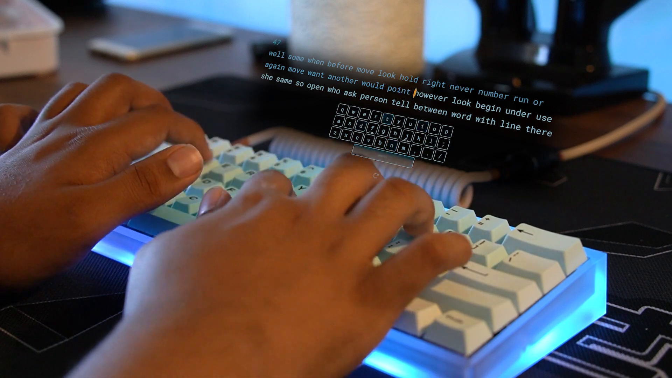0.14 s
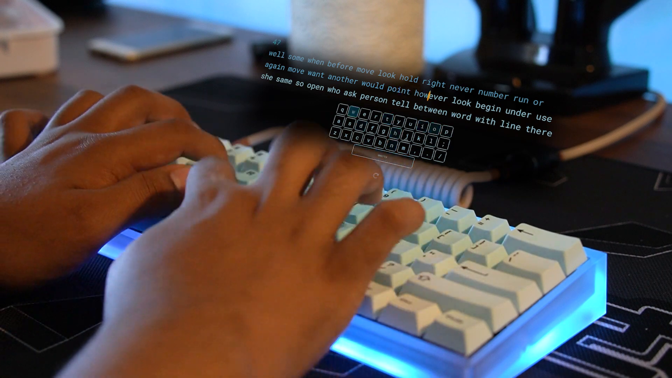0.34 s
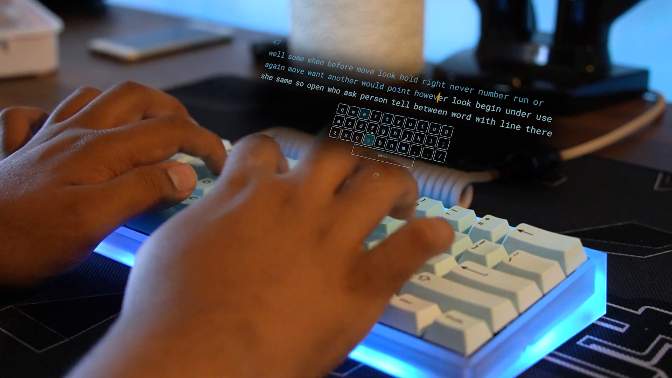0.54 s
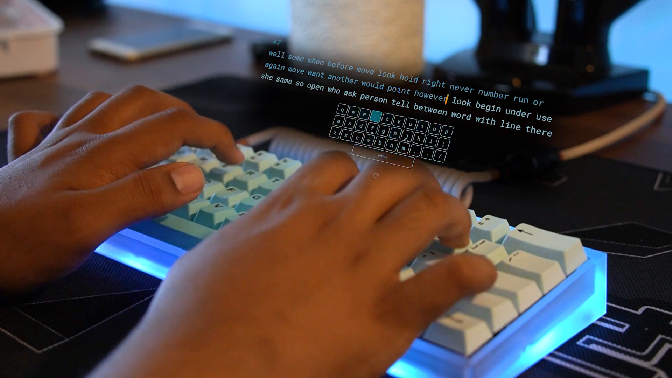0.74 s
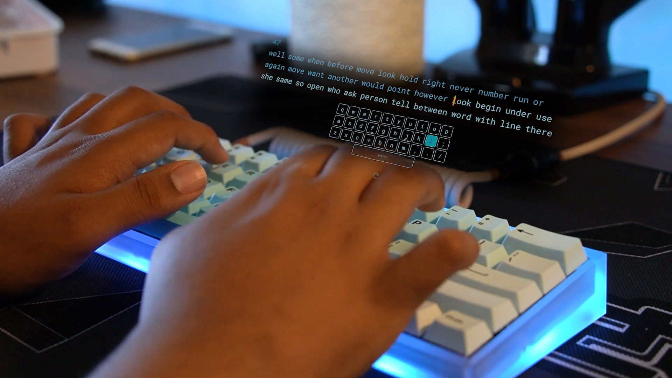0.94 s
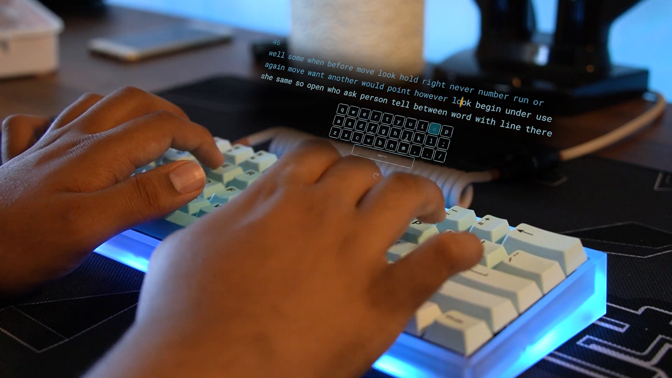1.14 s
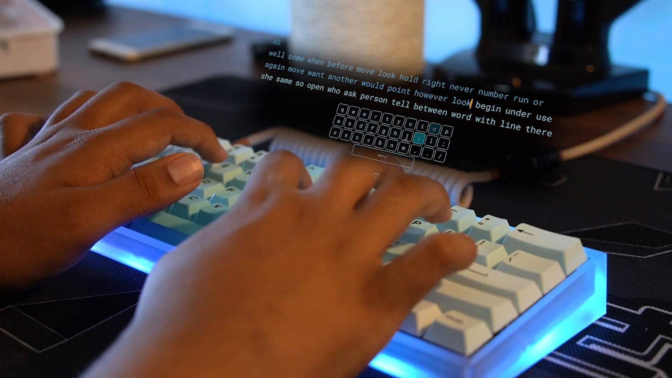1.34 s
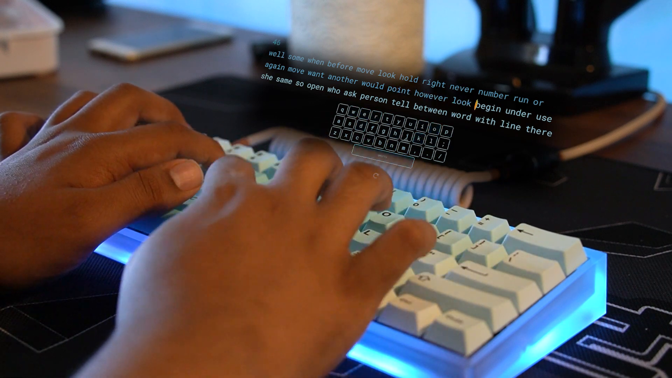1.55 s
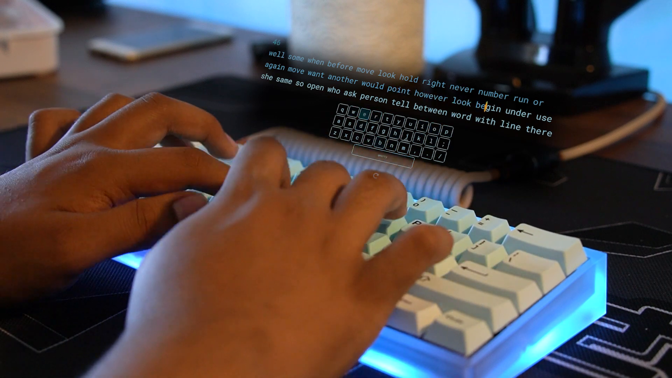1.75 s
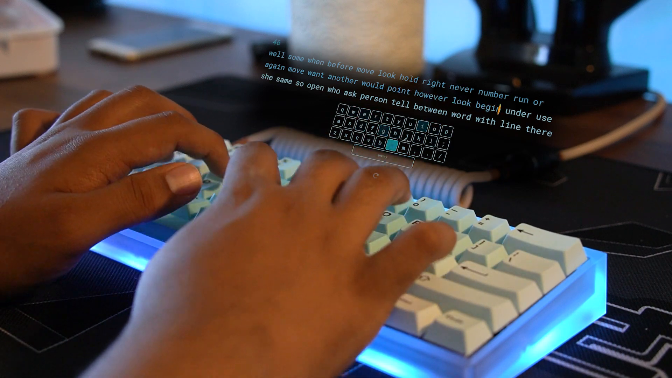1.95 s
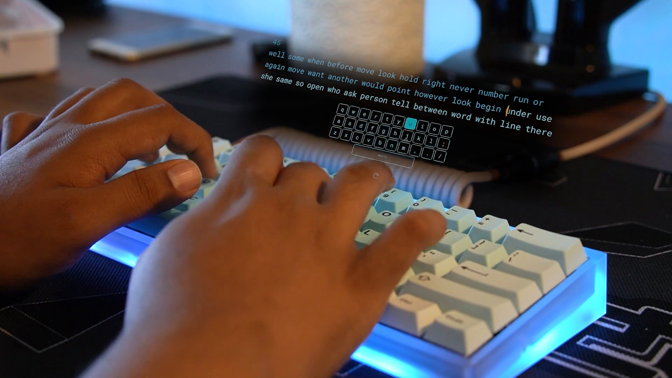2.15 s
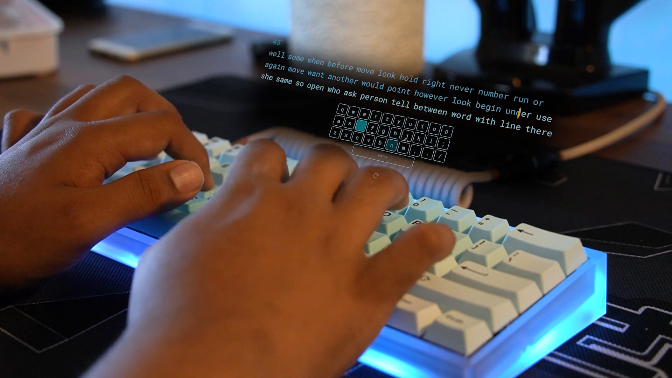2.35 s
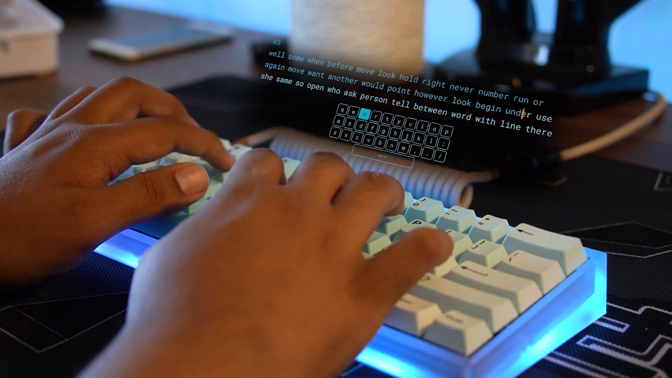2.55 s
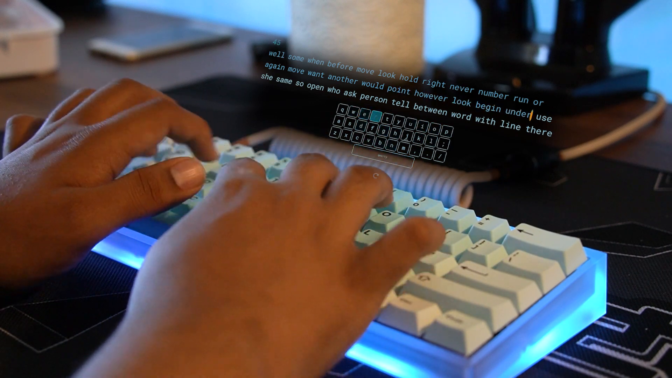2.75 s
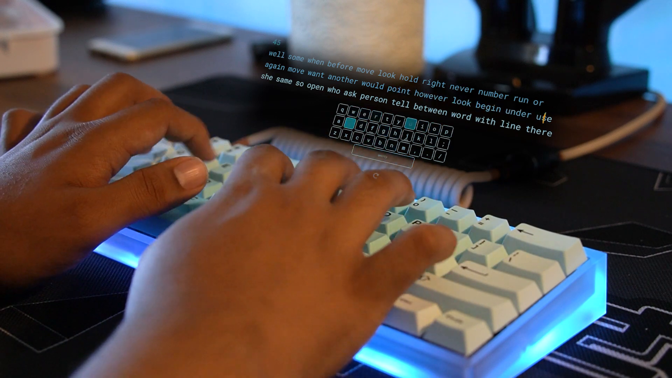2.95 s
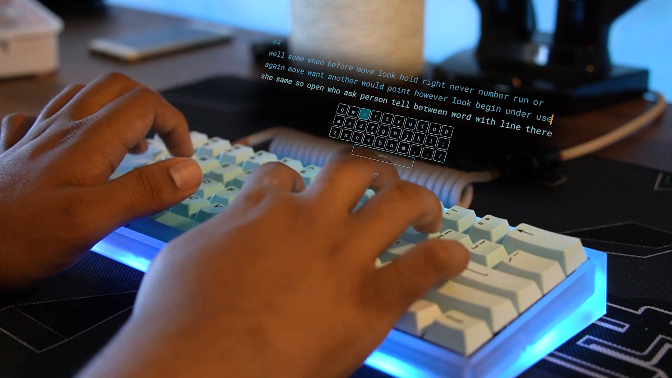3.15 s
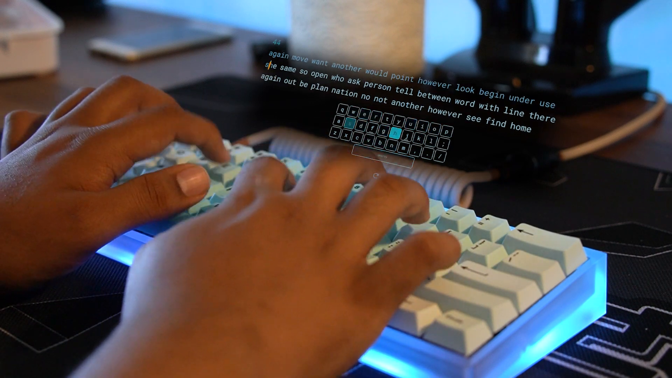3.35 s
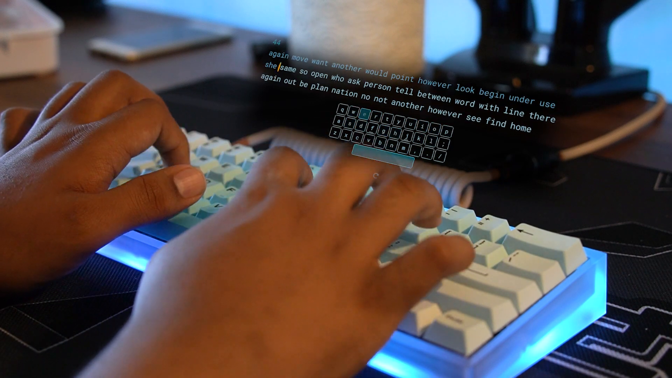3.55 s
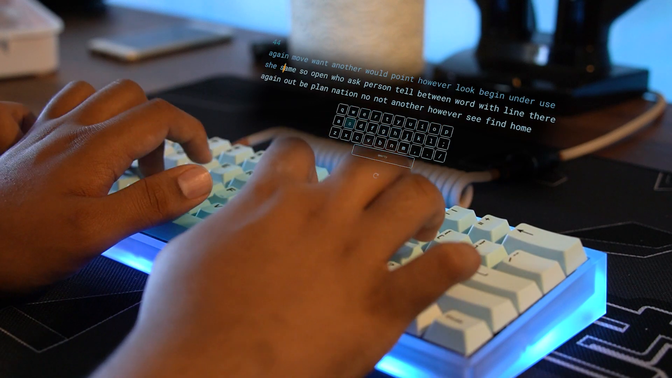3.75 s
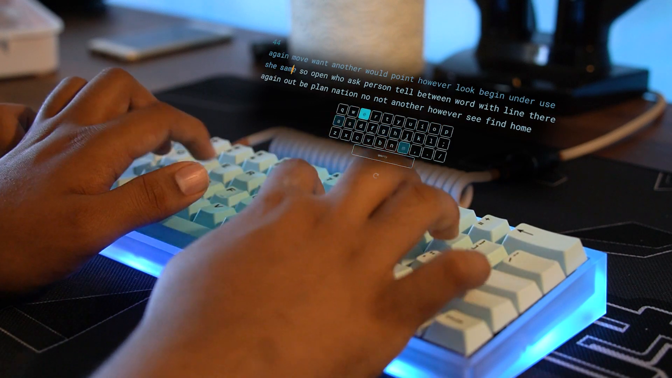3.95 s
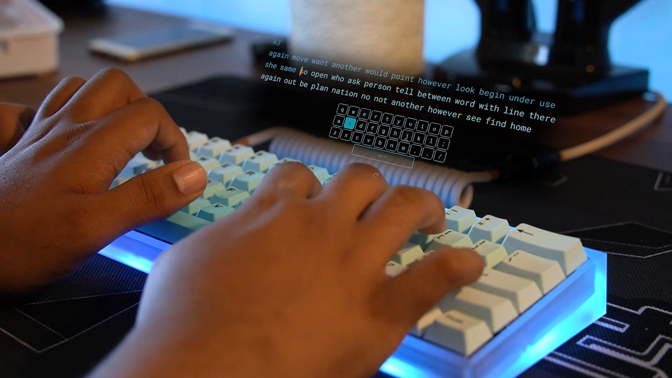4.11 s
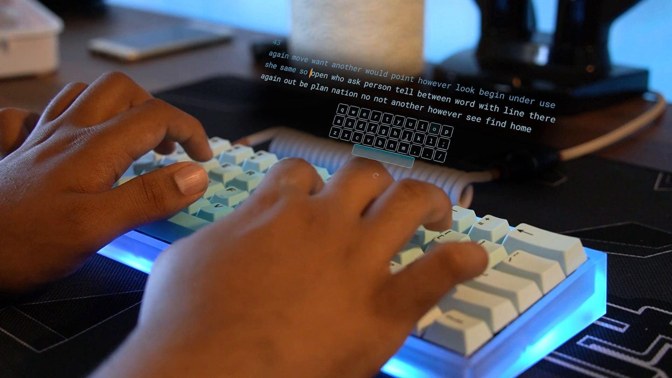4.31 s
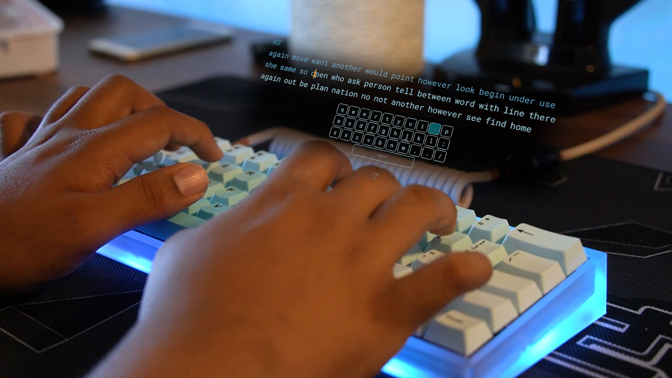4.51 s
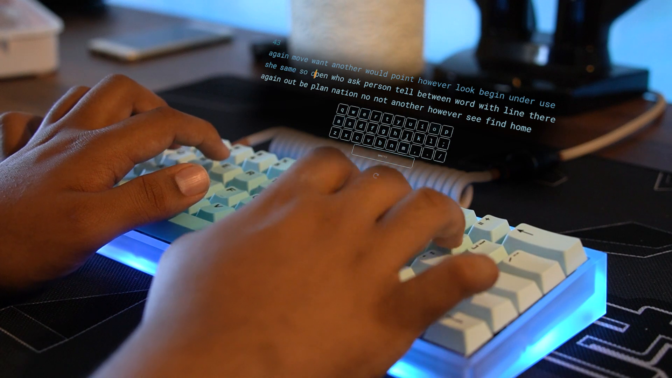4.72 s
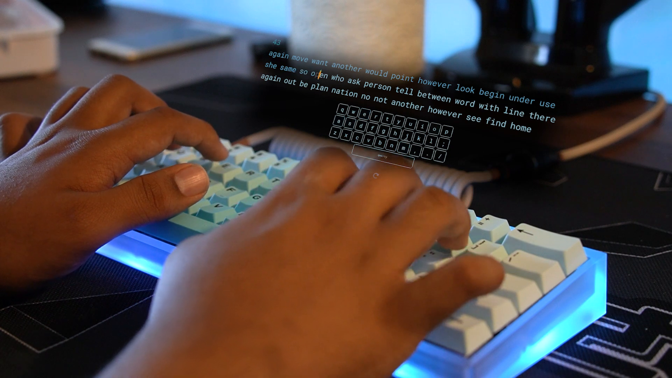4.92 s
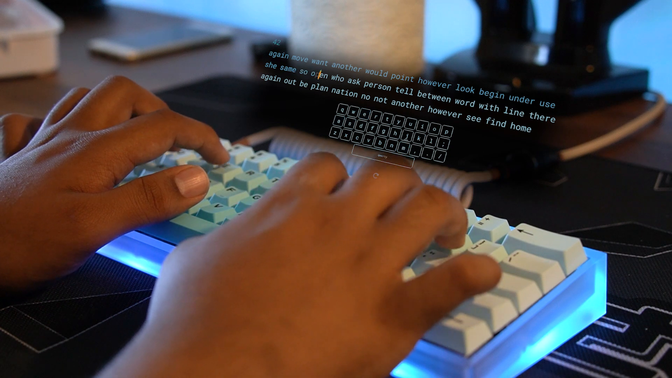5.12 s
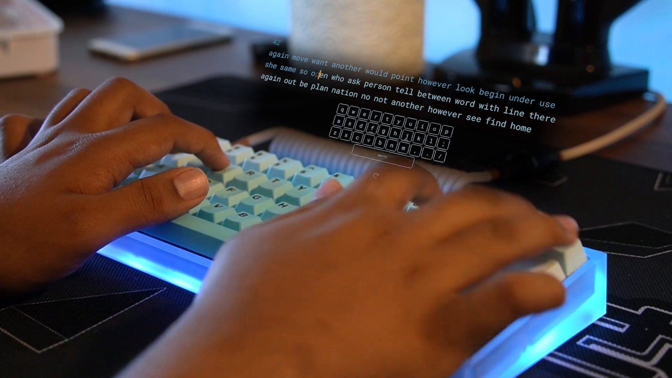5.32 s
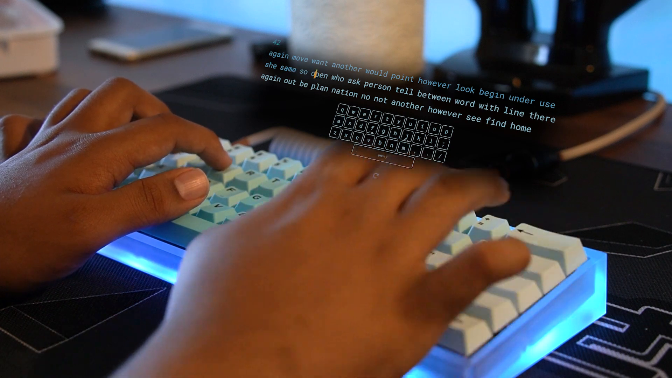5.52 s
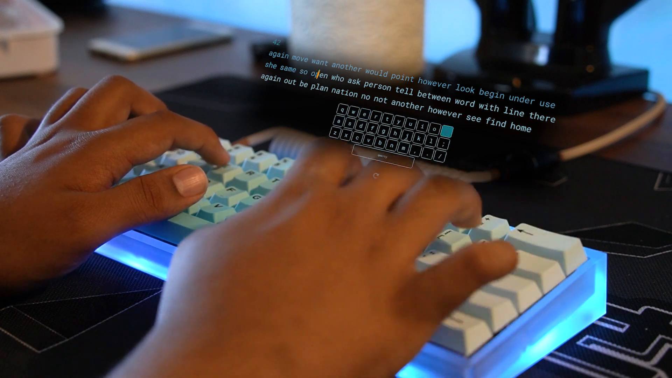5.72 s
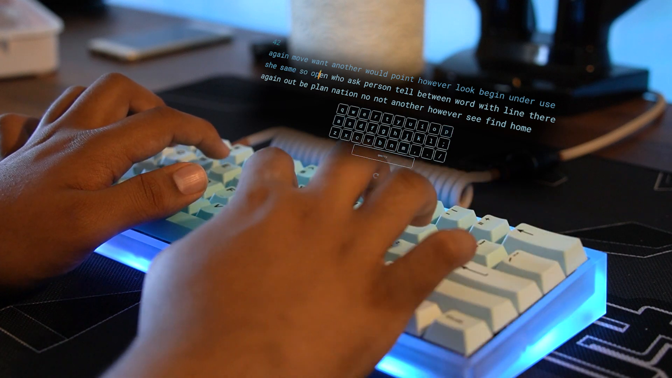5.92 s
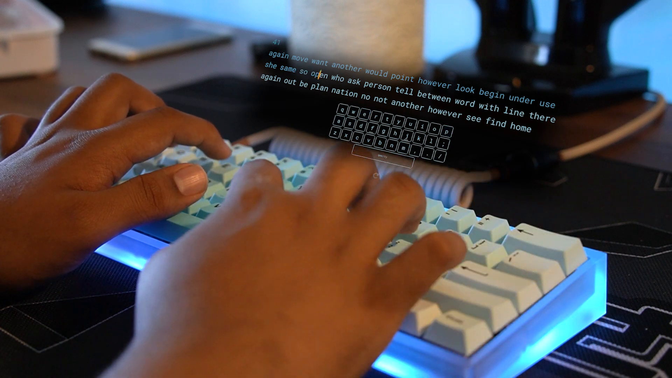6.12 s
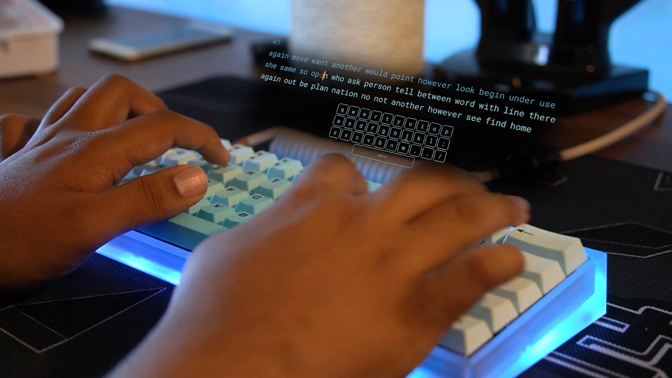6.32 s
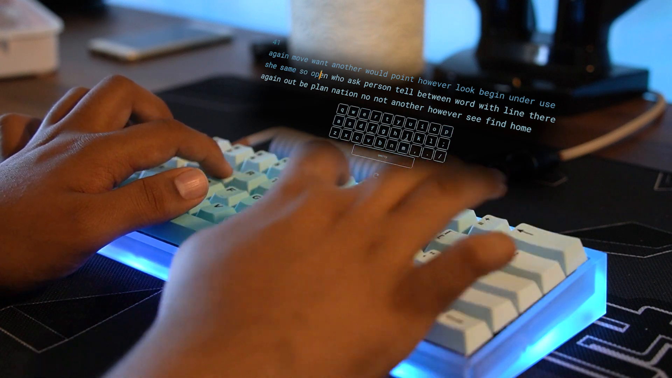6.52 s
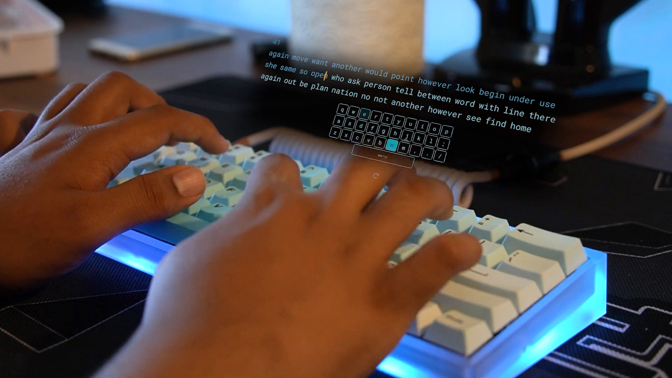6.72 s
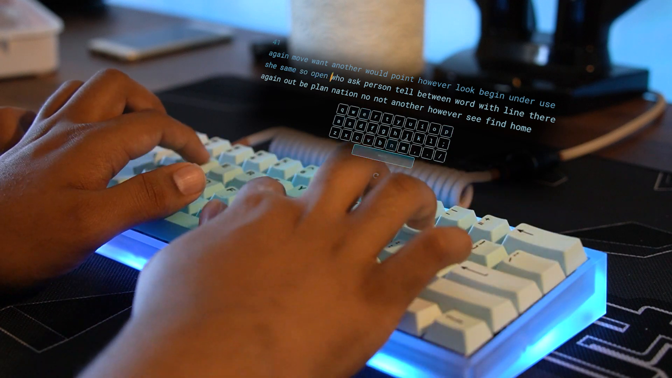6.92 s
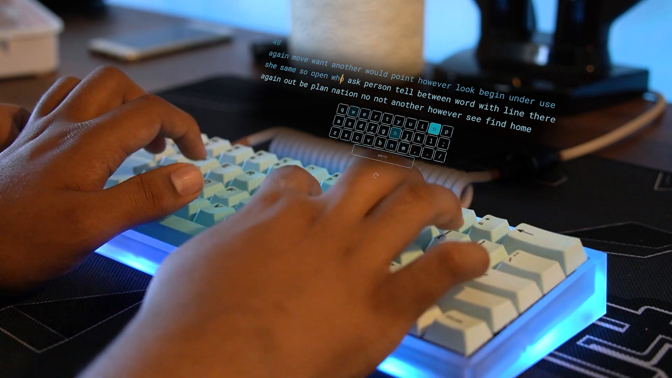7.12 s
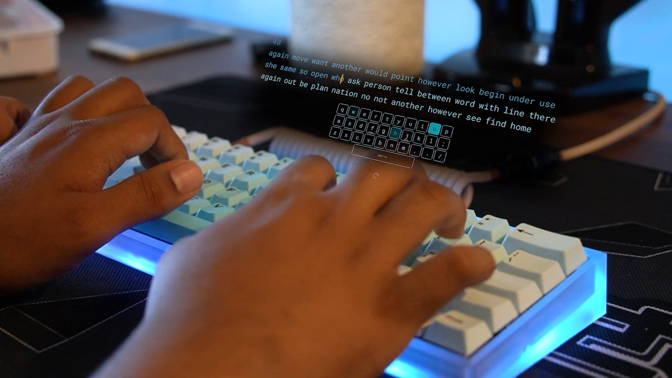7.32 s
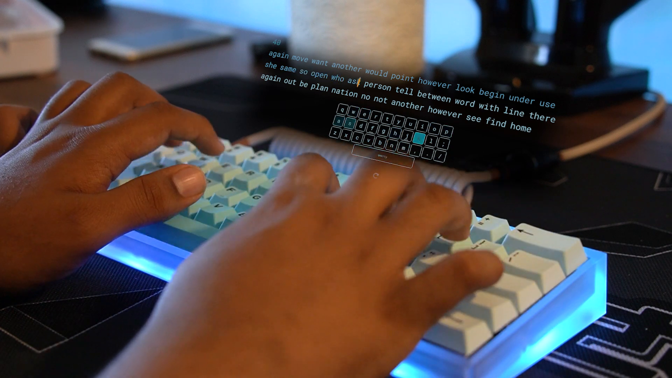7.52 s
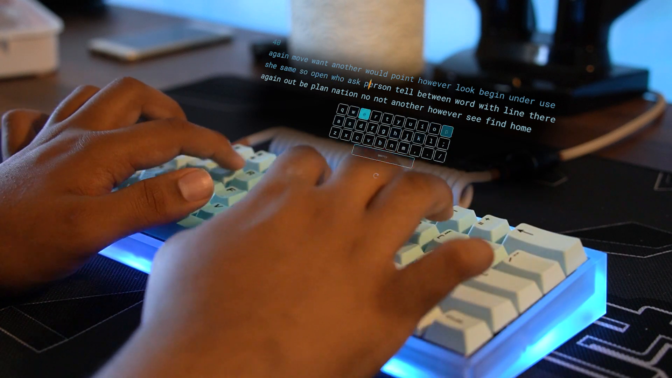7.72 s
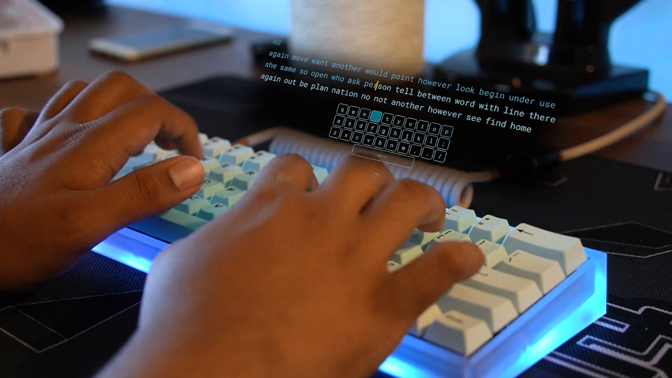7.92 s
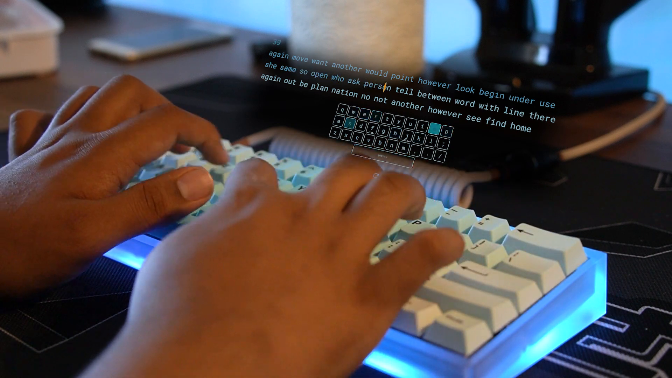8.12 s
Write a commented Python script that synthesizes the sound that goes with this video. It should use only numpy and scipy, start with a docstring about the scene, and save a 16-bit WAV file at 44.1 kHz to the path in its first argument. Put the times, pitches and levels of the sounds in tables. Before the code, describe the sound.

Fast typing on a mechanical keyboard in a thick plastic case starts right away, heard from a close microphone on the same desk. Crisp, bright clacks come in dense, uneven runs, some sharp and some light, with one of the hardest near 0.4 seconds. Wide keys add occasional hollower knocks. The typing stays busy until about 4.3 seconds, then thins to a few isolated, mostly softer taps, including a small cluster around 5.5 seconds and two clicks just after 6. From about 6.5 seconds the quick typing resumes and continues to the end, a little past 8 seconds. The strokes send soft thuds and a faint low rumble through the desk, with very faint fingertip ticks on the keycaps. The small room gives only a trace of echo, and a quiet fan hum and hiss run throughout.

```python
"""Fast typing on a mechanical keyboard in a thick plastic case, close to a microphone on the same desk.
Each key's stem (the post under the cap) hits its stop in a few quick contacts, making the cap, stem,
switch housing, plate and case ring for a moment. Fingertips rustle and the desk sways under the hands.
A small room echoes faintly, and fans hum over the microphone hiss."""
import sys
import numpy as np
from scipy import signal
from scipy.fft import rfft, irfft, next_fast_len
from scipy.io import wavfile

SR = 44100
rng = np.random.default_rng(int(sys.argv[2]) if len(sys.argv) > 2 else 0)


def wrap_up_sound(samples):
    """Save the sound to the file named by the first command line argument, as 16-bit audio."""
    columns = np.atleast_2d(samples).T
    # keep every value between -1 and 1, then stretch to whole-number steps
    tamed = np.clip(columns, -1, 1)
    steps = np.round(tamed * 32767).astype(np.int16)
    wavfile.write(sys.argv[1], SR, steps)


N = 364266


def undb(db):
    """Turn decibels into a number to multiply a sound by."""
    return 10 ** (np.asarray(db) / 20)


def shaped_noise(gain):
    """Noise with an average level (rms) of 1; gain(hz) says how strong each pitch is."""
    size = next_fast_len(N)
    hz = np.maximum(np.arange(size // 2 + 1) * SR / size, 1)
    noise = irfft(rfft(rng.standard_normal(size)) * gain(hz), size)[:N]
    return noise / np.sqrt(np.mean(noise ** 2))


def ring(tones, level_span_s, hits=(1.0,), pitch_scale=1, detune=0, luck=((0, 0),) * 6):
    """A struck part rings with tones that fade 60 dB in ring_s. Its rms is 1 over level_span_s."""
    t = np.arange(int(SR * max(ring_s for _, _, ring_s in tones))) / SR
    body = np.zeros(len(t))
    for (hz, db, ring_s), (level_luck, pitch_luck) in zip(tones, luck):
        pitch_hz = hz * pitch_scale * (1 + detune * pitch_luck)
        body += undb(db + 5 * level_luck - 60 * t / ring_s) * np.sin(2 * np.pi * pitch_hz * t)
    lowest_hz, highest_hz = pitch_scale * min(tones)[0], pitch_scale * max(tones)[0]
    if lowest_hz > 1500:  # the finger chokes the small parts after about 3 ms
        body *= np.exp(-(t / .003) ** 2)
    # a part gives off little below its lowest tone, and a soft hit stirs little above its highest
    edges_hz = [0.79 * lowest_hz, min(1.57 * highest_hz, .45 * SR)]
    band = signal.butter(3, edges_hz, "band", fs=SR, output="sos")
    sound = signal.sosfilt(band, signal.fftconvolve(body, hits))
    return sound / np.sqrt(np.sum(sound[:int(level_span_s * SR)] ** 2) / (level_span_s * SR))


# The shape of the room noise and microphone hiss: pitch_hz, relative_db
HISS_SHAPE = [(40, -52), (60, 0.5), (85, -9), (180, -7), (260, -14), (470, -15.5), (800, -18),
              (1300, -20.5), (2500, -23.5), (6000, -26.5), (16000, -31)]
# The hum of fans and mains power: pitch_hz, width_hz, level_db
HUM_TONES = [(115.85, 4.7, -68.5), (131, 11, -81.5), (179.5, 6.1, -71.5), (216.3, 3.7, -78), (473, 10, -84),
             (496, 8, -82), (768, 2.5, -83)]


def hiss_and_hum():
    """Steady room noise and hiss, with a wavering hum and a thin whine."""
    pitches_hz, shape_db = np.transpose(HISS_SHAPE)
    hiss = shaped_noise(lambda hz: undb(np.interp(np.log(hz), np.log(pitches_hz), shape_db, left=-60)))
    hum = sum(undb(level_db) * shaped_noise(lambda hz: 1 / (1 + (2 * (hz - pitch_hz) / width_hz) ** 2))
              for pitch_hz, width_hz, level_db in HUM_TONES)
    whine = np.sqrt(2) * np.sin(2 * np.pi * 6250 * np.arange(N) / SR)
    return undb(-62.5) * hiss + hum + undb(-90) * whine


def room_echo(sound, level_db=-25.5, build_s=.02, fade_s=0.18):
    """Desk, screen and walls send back a dense echo whose treble dies first."""
    t = np.arange(int(fade_s * SR)) / SR
    noise = rng.standard_normal(len(t))
    dull = signal.lfilter(*signal.butter(1, 4000, fs=SR), noise)
    fade = undb(-60 * t / fade_s)
    echo = (dull * fade + .8 * (noise - dull) * fade ** 1.5) * np.clip(t / build_s, 0, 1)
    return undb(level_db) * signal.fftconvolve(sound, echo / np.sqrt(np.sum(echo ** 2)))[:N]


# The low tones of the desk top: pitch_hz, relative_db, ring_s
DESK_TONES = [(33.6, 4.5, 0.17), (57.6, -25, 0.12), (131.3, -11.5, 0.13)]
# How much the hands shake the desk, least around the pause: time_s, relative_db
HAND_SHAKE = [(0, 0), (2.2, -2.5), (3.5, 1.5), (4.4, 3), (5.3, -6.5), (6.5, -7.5), (7.0, -4.5), (8.26, 2.5)]


def desk(blows):
    """Blows make the desk thud under the microphone stand; the hands add a slow sway and a rumble."""
    thud = signal.fftconvolve(blows, ring(DESK_TONES, level_span_s=0.044))[:N]
    sway = shaped_noise(lambda hz: (hz / 9) ** 2 / (1 + (hz / 14) ** 6))
    rumble = shaped_noise(lambda hz: (hz / 30) ** 3 / (1 + (hz / 36) ** 7))
    shake = undb(np.interp(np.arange(N) / SR, *np.transpose(HAND_SHAKE)))
    return thud + shake * (undb(-41.5) * sway + undb(-61.5) * rumble)


def finger_rustle(starts_s, ticks_per_stroke=6):
    """Fingertips brush the caps and stems slide, making faint ticks around each stroke."""
    luck = rng.random((len(starts_s), ticks_per_stroke, 2))
    ticks_s = starts_s[:, None] + 0.076 * (luck[..., 0] - .6)
    ticks_db = -4.5 * np.log(luck[..., 1] + 0.013)
    ticks = np.zeros(N)
    np.add.at(ticks, np.clip(ticks_s * SR, 0, N - 1).astype(int), undb(ticks_db))
    cap, stem = (signal.fftconvolve(ticks, ring(tones, level_span_s=0.0054))[:N]
                 for tones in (CAP_TONES, STEM_TONES))
    return undb(-79.5) * cap + undb(-85.5) * stem


# Wide keys on a steadying wire. Level and pitch are the cap's; the other db values add to level_db.
# start_s, level_db, pitch_hz, stem_db, case_db, plate_db
WIDE_KEYS = [(0.0565, -44, 2600, -8, -2.5, -5), (0.1343, -57.5, 2620, -18, 1.5, -1),
             (0.7853, -43.5, 2900, -9, -6.5, -5.5), (1.4327, -41.5, 2600, -7.5, -8, -21),
             (2.0164, -34, 3140, -9.5, -12.5, -20), (2.7786, -46, 2970, -8, -4.5, -6.5),
             (3.183, -47, 2250, -9, -3, -10), (3.5138, -47.5, 2480, -15, -4, -4),
             (4.017, -34.5, 2530, -0.5, -13.5, -16.5), (4.2708, -40, 2830, -7.5, -9, -18),
             (5.4283, -41, 2300, -12.5, -11.5, -14), (5.517, -50.5, 2280, -27, -1, -4),
             (6.4806, -44.5, 2540, -19, -6, -9), (6.562, -46, 2000, -23, -5.5, -6.5),
             (7.203, -50, 2480, -10, 1, -3), (7.54, -40, 2790, -8.5, -8.5, -13.5)]


def wide_strokes(contact_ms=1.5, housing_db=-7):
    """Wide keys boom in the case. Gives one row per stroke for keyboard()."""
    return np.array([(*key[:4], contact_ms, housing_db, *key[4:]) for key in WIDE_KEYS])


# Letter keys landing or springing back. Level and pitch are the cap's; other db values add to level_db.
# start_s, level_db, pitch_hz, stem_db, contact_ms, housing_db
LETTER_KEYS = [(0.0403, -41.5, 3020, -12, 0.9, 0), (0.0507, -39, 2600, -13, 1.6, -16),
               (0.1725, -53, 3020, -28, 1.35, -17), (0.1957, -51.5, 2870, -33, 0.24, -25),
               (0.2626, -38, 2680, -23, 1.05, -24), (0.2815, -45.5, 2560, -13, 0.3, -12),
               (0.3373, -34, 2560, -7.5, 0.6, -13), (0.4201, -23.5, 2540, -6, 0.25, -14.5),
               (0.4643, -35, 2580, -21, 0.13, -18), (0.4923, -32, 2420, -4, 1.65, -14.5),
               (0.5367, -40, 2730, -10, 0.58, -16), (0.5784, -29, 2750, -7.5, 0.17, -16.5),
               (0.6491, -33.5, 2500, -6.5, 2.3, -12), (0.7181, -40, 2320, -29, 0.22, -23),
               (0.753, -47, 2930, -13.5, 1.06, -7.5), (0.802, -44.5, 2430, -10, 0.55, -14),
               (0.8827, -46, 2350, -30, 1, -17), (0.94, -34, 2980, -22, 0.12, -13.5),
               (1.0184, -42.5, 2650, -11.5, 0.2, -11), (1.1112, -50, 2750, -38, 0.2, -18),
               (1.195, -58.5, 2620, -25, 1.4, -16), (1.3106, -36.5, 2900, -19, 0.14, -17),
               (1.3552, -57.5, 2430, -27.5, 0.66, -13), (1.3938, -43, 2770, -19, 0.65, -23),
               (1.4145, -53, 2790, -15, 2.8, -11), (1.577, -54, 2270, -29, 0.66, -24),
               (1.635, -29, 2500, -9.5, 0.17, -17), (1.6476, -40.5, 2620, -9.5, 0.3, -16),
               (1.707, -36, 2590, -1.5, 1.68, -12), (1.8119, -33, 2410, -14, 0.62, -17),
               (1.8406, -35.5, 2680, -8, 0.54, -7), (1.9042, -43, 2800, -9, 0.42, -12),
               (1.9284, -51, 2630, -2, 2.2, -8), (1.9379, -51, 2650, -25, 0.41, -28),
               (1.9987, -58.5, 2770, -21, 1.1, -18), (2.006, -48, 2640, -11, 1.13, -10),
               (2.1716, -44.5, 2640, -16, 0.17, -23), (2.2128, -47, 2750, -7, 0.39, -15),
               (2.233, -47.5, 2490, -11, 0.47, -15), (2.28, -39, 2620, -15, 0.27, -14),
               (2.3669, -32, 2700, -26, 0.5, -21.5), (2.4643, -52, 2630, -20, 0.27, -26),
               (2.5551, -32.5, 2470, -6.5, 0.26, -11), (2.6336, -34, 2530, -3.5, 0.76, -8.5),
               (2.7142, -39.5, 2450, -23, 0.17, -25), (2.7432, -56.5, 2610, -14, 2.7, -7),
               (2.795, -45.5, 2340, -6.5, 0.92, -10), (2.8634, -52.5, 2380, -20, 0.86, -25),
               (2.91, -36.5, 2780, -12, 0.2, -12), (2.932, -33.5, 2640, -19, 0.2, -15.5),
               (2.9916, -43.5, 2440, -16, 0.29, -13), (3.0114, -36, 2560, -10, 0.59, -10.5),
               (3.1047, -27, 2260, -3, 0.4, -11), (3.1728, -33.5, 2360, 1.5, 0.8, -9.5),
               (3.2927, -37, 2670, -30, 0.13, -18.5), (3.3513, -50, 3020, -17, 0.4, -16),
               (3.3663, -32, 2440, -2.5, 0.47, -7), (3.4163, -42, 2940, -15.5, 0.5, -15),
               (3.462, -27.5, 2360, -4.5, 0.26, -15), (3.486, -48, 3000, -13, 1.4, -5),
               (3.5295, -35, 2420, -0.5, 1.26, -8), (3.6202, -47, 2290, -25, 1.6, -13.5),
               (3.6711, -38, 2600, -22.5, 0.23, -18), (3.75, -38, 2520, -9.5, 0.69, -7),
               (3.8202, -37, 2610, -38, 0.18, -27), (3.8756, -47, 2750, -14, 0.2, -17),
               (3.8966, -44.5, 2600, -24.5, 0.6, -24), (3.9481, -37, 2730, -21.5, 0.54, -22),
               (3.9536, -33.5, 2500, -4, 0.22, -15), (4.0015, -42, 3010, -8, 1.03, -3),
               (4.1068, -45.5, 2440, -18, 1.2, -11), (4.1207, -27.5, 2490, -15, 0.45, -11),
               (4.174, -54, 2750, -20, 0.32, -14), (4.2076, -44, 2620, -13, 0.3, -12),
               (4.2445, -57, 3030, -25, 0.72, -15), (4.256, -48, 2950, -20, 0.3, -14),
               (4.3538, -52.5, 2370, -20, 1.05, -17), (4.621, -51, 2760, -16, 0.22, -15),
               (4.8384, -56.5, 2430, -20, 1.3, -19), (5.415, -59, 2290, -18, 0.91, -6),
               (5.6962, -59.5, 2470, -18, 2.4, -18), (5.789, -47, 2560, -16, 2.24, -13.5),
               (6.1444, -41, 2900, -56, 0.12, -34), (6.236, -39.5, 2760, -18, 0.15, -25),
               (6.6145, -38, 2740, -14, 0.17, -20), (6.6873, -43.5, 2470, 3.5, 1.1, -7),
               (6.7219, -43.5, 2800, -13, 0.18, -15), (6.7834, -61, 2820, -17, 6.7, -12),
               (6.792, -46, 2660, -14, 0.4, -17), (6.8096, -49, 2580, -11, 3.1, -4),
               (6.9241, -27.5, 2500, -22, 0.092, -27), (6.96, -58, 2960, -10.5, 2.3, -14.5),
               (6.9825, -49, 2880, -24, 0.26, -26), (7.0122, -47.5, 2550, -7, 0.3, -12),
               (7.0644, -38.5, 2950, -20, 0.32, -15.5), (7.0969, -45, 3040, -13, 0.97, -17),
               (7.1492, -43.5, 2630, -8.5, 0.93, -12.5), (7.171, -60, 2820, -17, 1.3, -7),
               (7.3018, -45.5, 2460, -22.5, 1.21, -15), (7.3407, -46.5, 2500, -37, 0.19, -32),
               (7.3662, -35, 2630, -22, 0.3, -21), (7.412, -33.5, 2870, -21, 0.12, -22),
               (7.4233, -48, 2370, -19, 0.35, -22), (7.4713, -40, 2520, -10, 0.45, -12),
               (7.4926, -34, 2870, -27.5, 0.6, -22.5), (7.5163, -51, 2950, -11, 2.15, 0),
               (7.6504, -49, 2500, -13, 0.92, -18), (7.7244, -38, 2470, -16, 0.65, -18),
               (7.7415, -62.5, 2860, -17.5, 2.6, -19), (7.7963, -36, 2540, -0.5, 1.22, -9.5),
               (7.8853, -42.5, 2560, -26, 0.2, -21), (7.9437, -35.5, 2470, -8.5, 1.3, -13.5),
               (8.0429, -35, 2520, -17.5, 0.18, -15), (8.1014, -44.5, 2830, -22, 0.2, -18),
               (8.1303, -41, 2470, -10, 0.42, -9), (8.192, -63, 2500, -20, 1.7, -17)]


def letter_strokes(hard_db=-38, touch_lead_s=0.0082, bounce_lag_s=0.0097, scatter_db=4.5):
    """Rows for keyboard(). The finger ticks on the cap before a hard stroke; the cap bounces after it."""
    typed = np.array(LETTER_KEYS)
    start_s, level_db, pitch_hz, stem_db = typed[typed[:, 1] > hard_db, :4].T
    luck = rng.standard_normal((len(start_s), 4)).T
    touches = np.broadcast_arrays(
        start_s - touch_lead_s * (1 + .15 * luck[0]),
        level_db - 35.5 + 0.47 * stem_db + scatter_db * luck[1],  # a loose stem ticks louder
        1.08 * pitch_hz, -2, 1.4, -1)  # same columns as LETTER_KEYS
    bounces = np.broadcast_arrays(
        start_s + bounce_lag_s * (1 + .1 * luck[2]),
        level_db - 30.5 + scatter_db * luck[3],
        .94 * pitch_hz, -11, 1.4, -1)
    strokes = np.vstack([typed, np.transpose(touches), np.transpose(bounces)])
    _, level_db, _, stem_db, contact_ms, _ = strokes.T
    # case and plate gain less from force than the cap; long contacts feed both, a loose stem the plate
    force_db = level_db + 40
    case_db = -72.5 + 0.23 * force_db + 3 * contact_ms - level_db
    plate_db = -55 + 0.39 * force_db + 0.9 * contact_ms + 0.065 * stem_db - level_db
    return np.c_[strokes, np.minimum(case_db, -12), np.minimum(plate_db, -3)]


# The tones of each keyboard part (the cap's shift with each key's pitch): pitch_hz, relative_db, ring_s
CAP_TONES = [(2700, 8.5, 0.0098), (2070, -34, 0.0041), (3520, -15.5, 0.038), (3135, -6, 0.021)]
CASE_TONES = [(265, -4, 0.062), (153, -10.5, 0.06), (355, 3.5, 0.029), (433, -6.5, 0.036), (610, -5, 0.039),
              (656, -5, 0.047)]
PLATE_TONES = [(1190, 5.5, 0.027), (1375, 4, 0.033), (973, -6, 0.017), (730, -9.5, 0.015)]
HOUSING_TONES = [(4610, 3.5, 0.024), (5530, -1, 0.0091), (6410, 1, 0.031), (7280, 11.5, 0.0086),
                 (8630, 0, 0.027), (9400, 3, 0.0072)]
STEM_TONES = [(10850, 0, .010), (10300, -9, .006), (11400, -10, .006), (13300, -19, .005),
              (14100, -14, .005), (15500, -26, .005)]


def keyboard(strokes, rattle_db=-46, rattle_s=.05):
    """Each stroke hits, chatters and rattles, ringing five parts. Gives clacks and blows to the desk."""
    clacks, blows = np.zeros(N + SR), np.zeros(N)
    luck = rng.standard_normal((len(strokes), 6, 6, 2))  # each key sits elsewhere, so its tones vary
    timing = rng.random((len(strokes), 3))
    # loose caps and wires rattle on after the hit
    fade = undb(rattle_db - 60 * np.arange(1100) / SR / rattle_s)
    shape = (len(strokes), len(fade))
    rattles = fade * rng.standard_normal(shape) * rng.exponential(size=shape)
    for i, stroke in enumerate(strokes):
        start_s, level_db, pitch_hz, stem_db, contact_ms, housing_db, case_db, plate_db = stroke
        hits, hit_luck = rattles[i], luck[i, 5]
        hits[0] = 1  # the first hit
        contact_samples = max(contact_ms, .1) * SR / 1000
        chatter_at = ((np.arange(3) + timing[i]) / 3 * contact_samples).astype(int) + 1
        chatter = min(0.23 * contact_ms, .9) * undb(3.8 * hit_luck[:3, 0]) * np.sign(hit_luck[:3, 1])
        np.add.at(hits, chatter_at, chatter)
        push = np.abs(hits[:int(contact_samples) + 2])  # the heavy case feels it all as one push
        cap = ring(CAP_TONES, .005, hits, pitch_hz / CAP_TONES[0][0], detune=.015, luck=luck[i, 0])
        case = undb(case_db) * ring(CASE_TONES, .02, push, detune=.04, luck=luck[i, 1])
        plate = undb(plate_db) * ring(PLATE_TONES, .02, hits, detune=.04, luck=luck[i, 2])
        housing = undb(housing_db) * ring(HOUSING_TONES, .005, hits, detune=.04, luck=luck[i, 3])
        stem = undb(stem_db) * ring(STEM_TONES, .005, hits, detune=.012, luck=luck[i, 4])
        start = int(start_s * SR)
        for part in (cap, case, plate, housing, stem):
            clacks[start:start + len(part)] -= undb(level_db) * part
        # the blow passes through the case's feet 3 ms later; the finger's push varies less than its clack
        finger_push = undb(0.31 * level_db - 43.5) * hit_luck[3, 0]
        blows[int((start_s + .003) * SR)] = undb(level_db + case_db - 11) + finger_push
    return clacks[:N], blows


def scene():
    """Left and right carry the same sound; only a faint, steady noise sets them apart."""
    strokes = np.vstack([wide_strokes(), letter_strokes()])
    clacks, blows = keyboard(strokes)
    typing = clacks + finger_rustle(strokes[:, 0])
    middle = typing + room_echo(typing) + desk(blows) + hiss_and_hum()
    side_noise = undb(-80.5) * shaped_noise(lambda hz: (hz > 18) * (0.38 + (hz / 200) ** -.6))
    return np.array([middle + side_noise, middle - side_noise])


def record(dry):
    """The recorder cuts the treble above 16000 Hz."""
    return signal.sosfilt(signal.ellip(10, .2, 80, 16000, fs=SR, output="sos"), dry)


dry = scene()
out = record(dry)
wrap_up_sound(out)
```